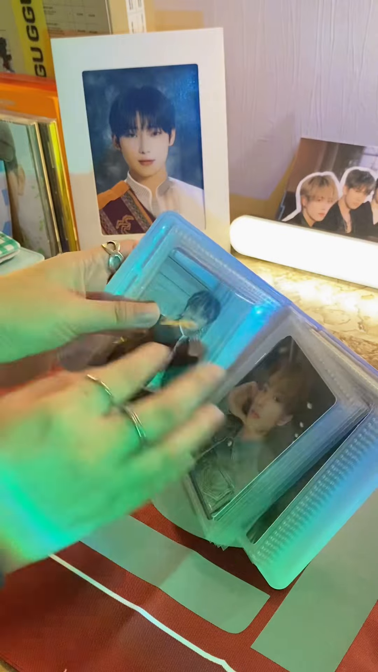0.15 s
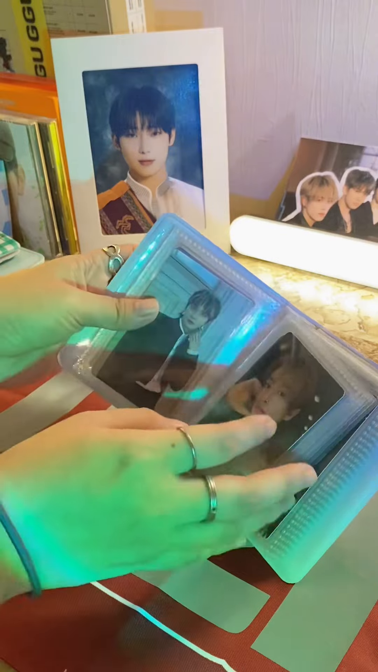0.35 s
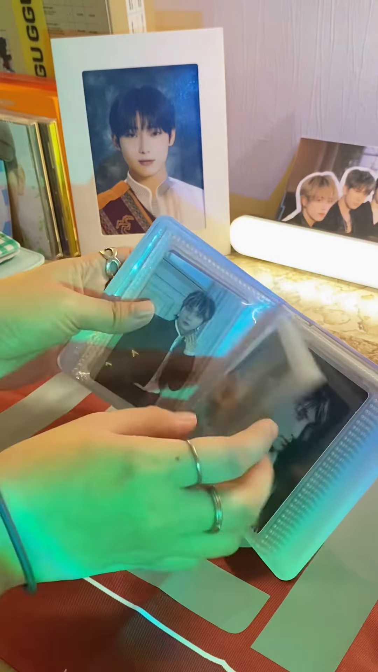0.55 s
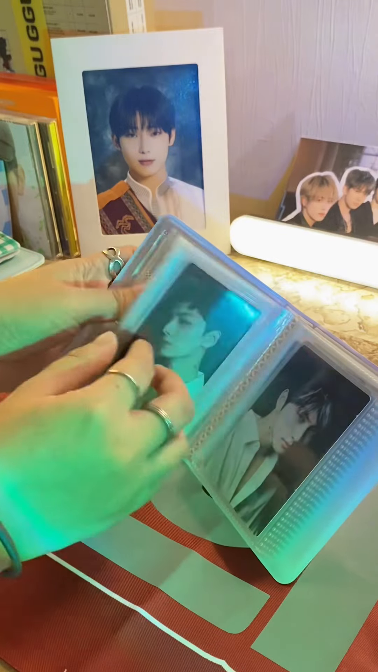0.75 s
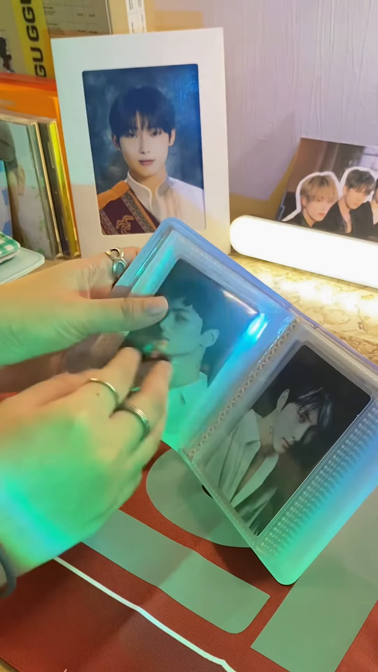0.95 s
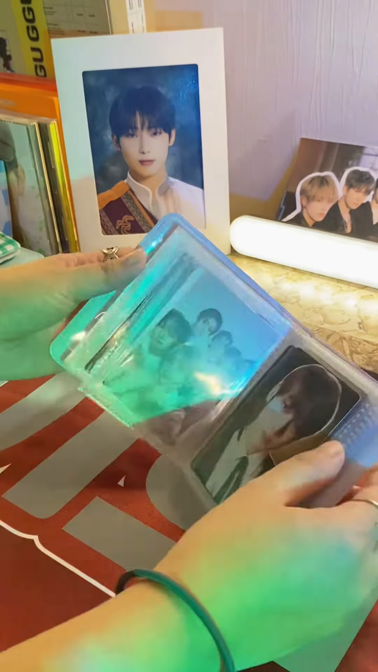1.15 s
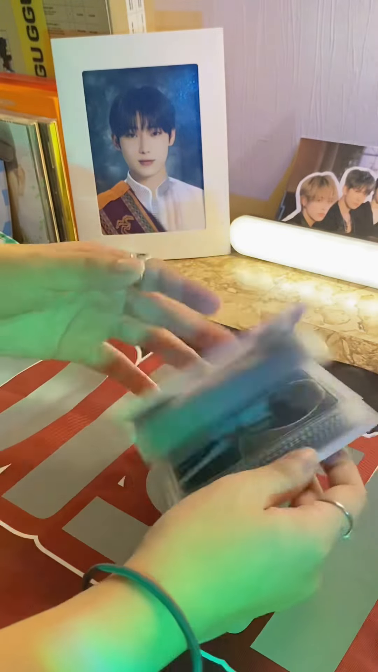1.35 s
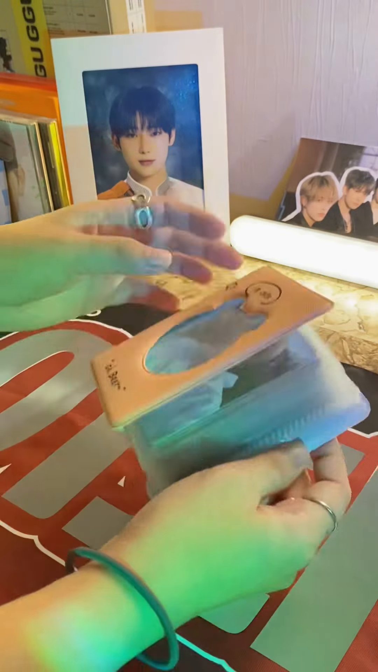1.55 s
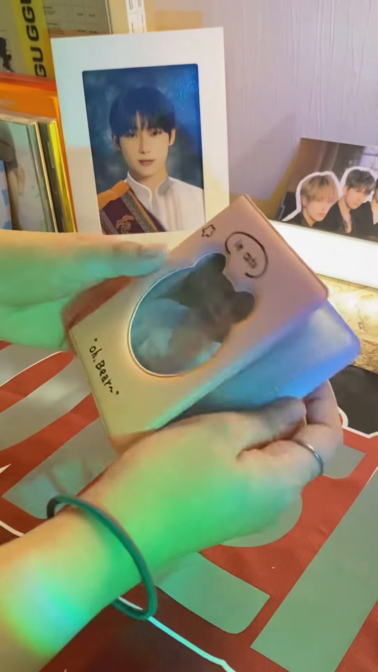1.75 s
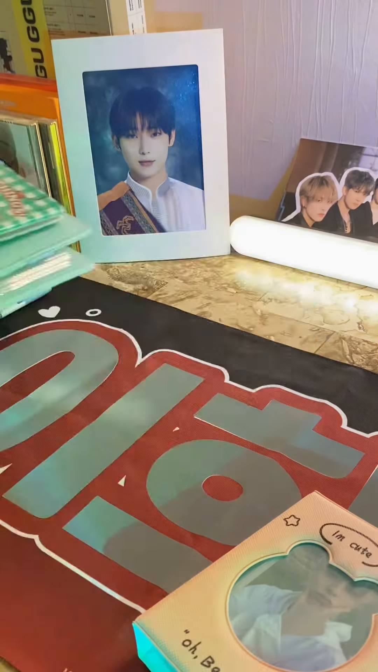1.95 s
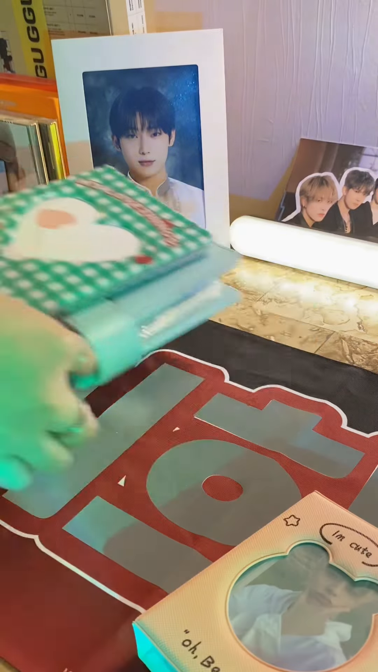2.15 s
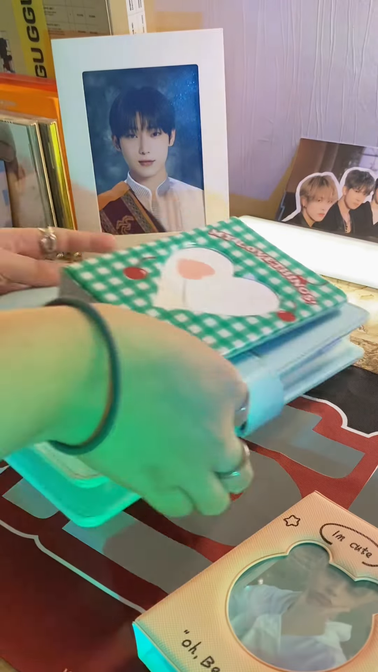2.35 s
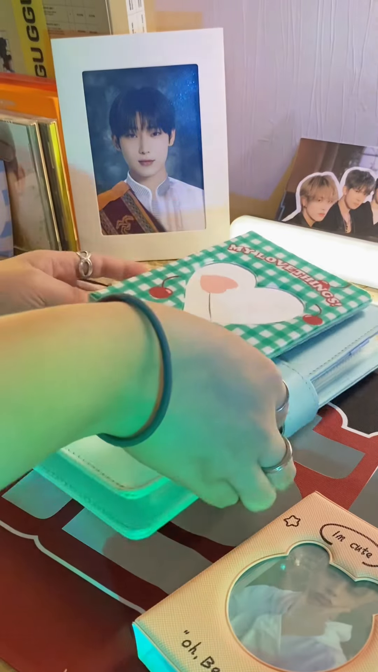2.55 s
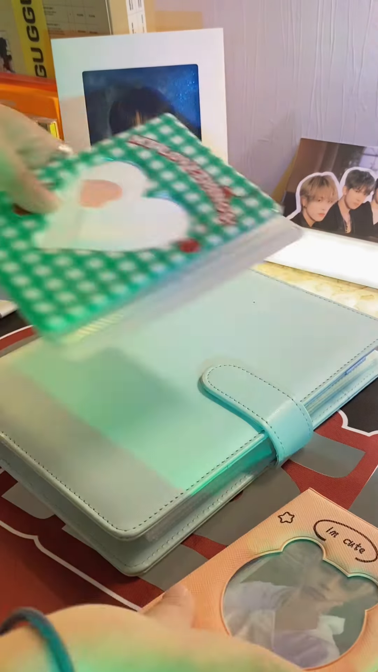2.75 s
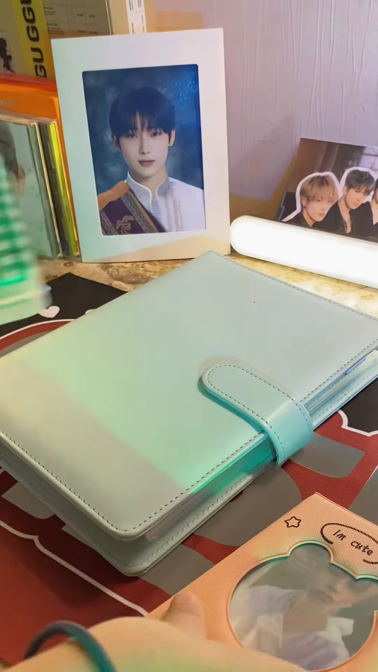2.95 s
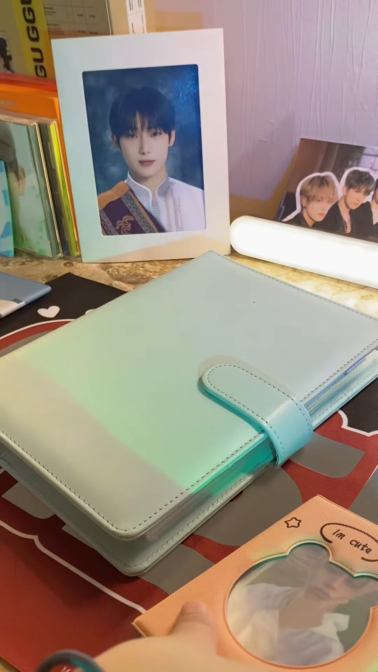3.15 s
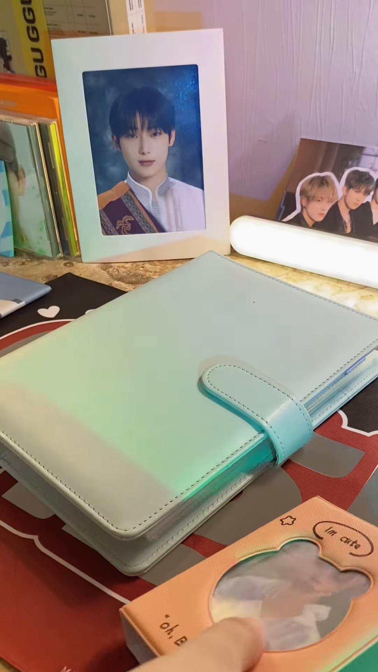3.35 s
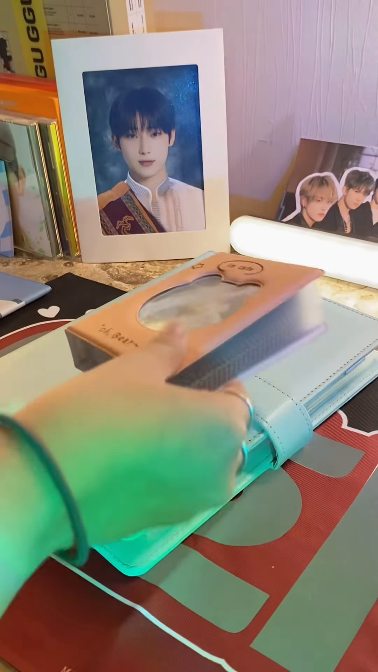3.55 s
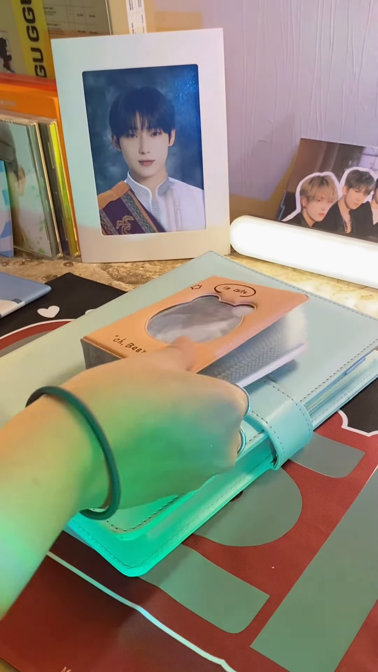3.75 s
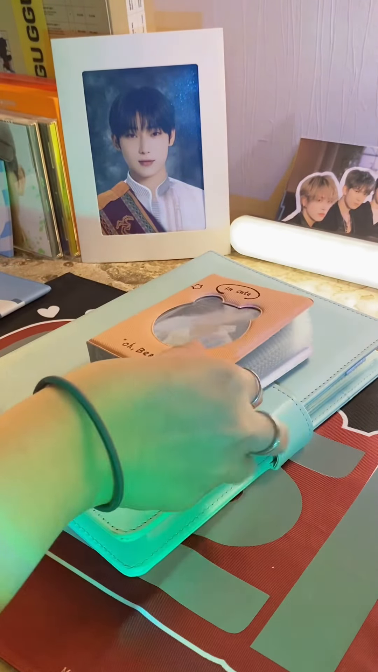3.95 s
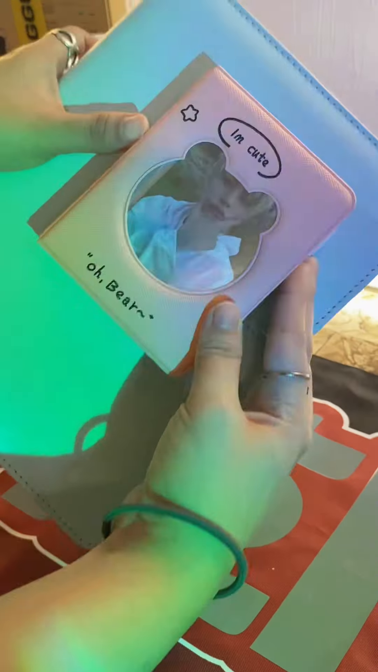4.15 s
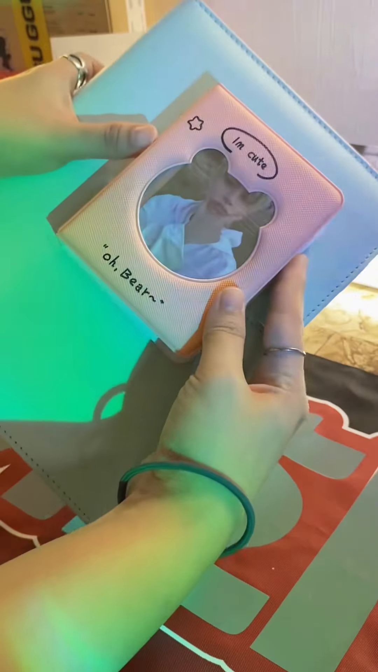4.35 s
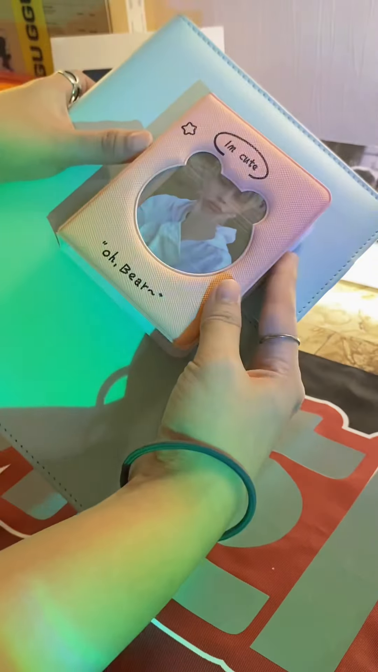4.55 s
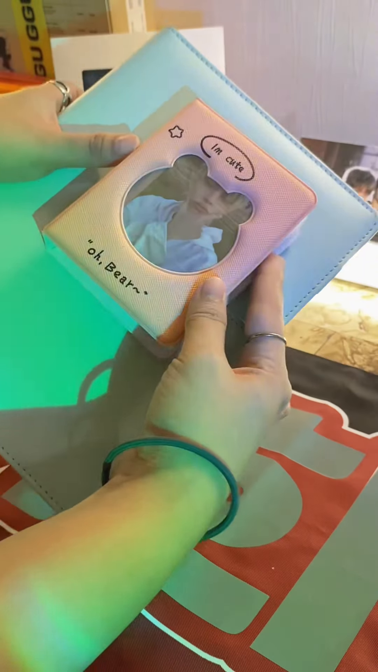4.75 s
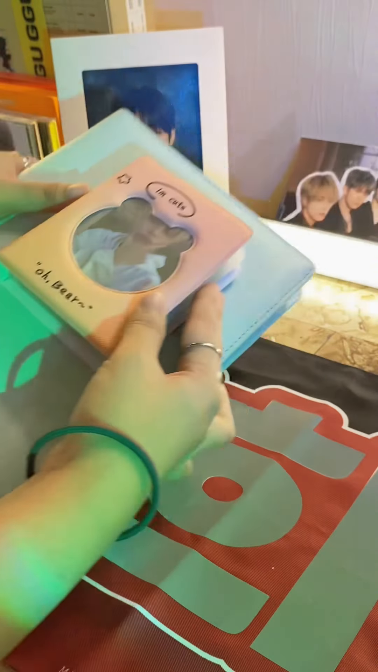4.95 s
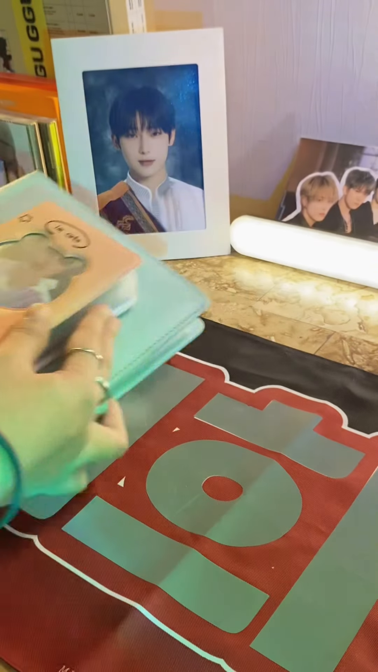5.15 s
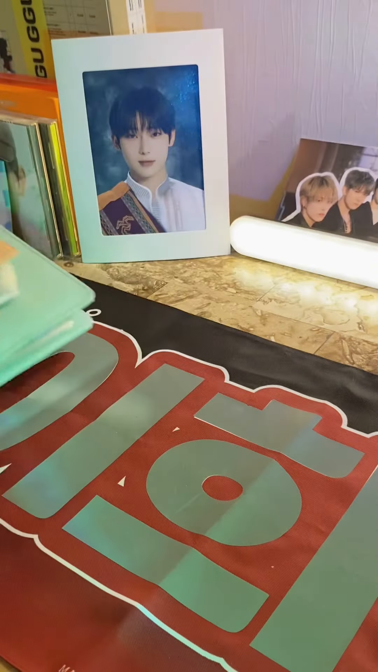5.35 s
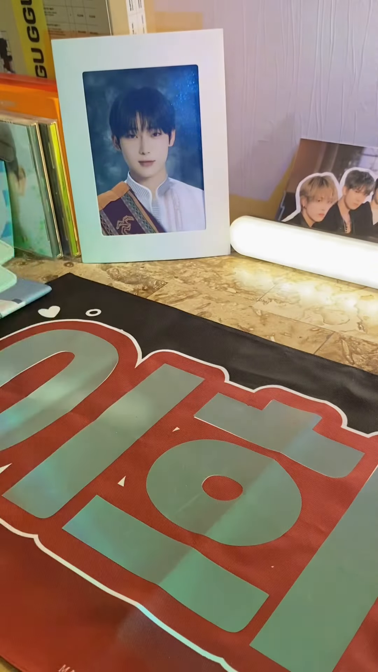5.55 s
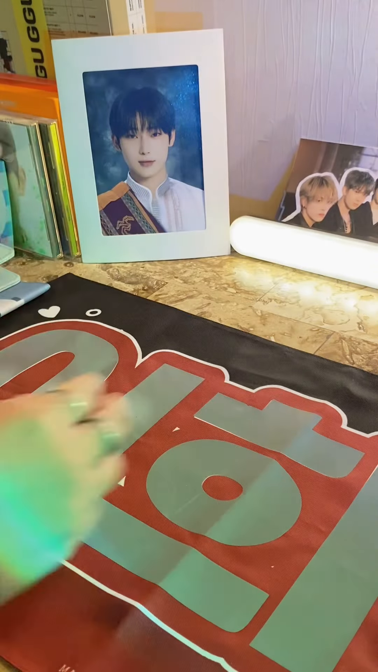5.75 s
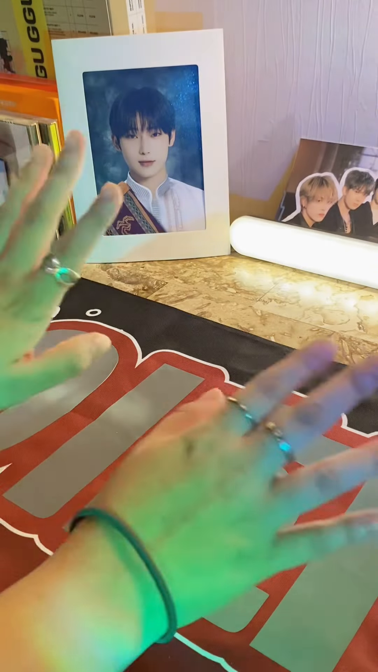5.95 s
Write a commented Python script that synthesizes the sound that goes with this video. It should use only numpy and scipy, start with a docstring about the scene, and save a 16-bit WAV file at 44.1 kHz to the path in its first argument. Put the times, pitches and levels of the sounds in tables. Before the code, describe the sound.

Stiff plastic pages are flipped in quick rustling strokes and brittle pops. A hard cover slaps shut at about 1.3 seconds with a woody desk thump and short flutter. Padded albums are then set down and moved with a dull knock near 2.7, a softer one near 3.7 and small clicks near 5.4. Quiet small room, close stereo pickup, low rumble and faint hiss.

```python
"""A small room: hands leaf through the clear plastic sleeves of a card album close to two microphone ports.
Sleeves slide and swish as stick-slip noise; creases snap and crackle as short bursts with a faint ring.
Covers slap shut as falling bending-wave chirps; dull contacts ring crowds of damped modes.
Padded binders bump the desk with slow cycles and drag as dull noise, above a low rumble, faint air
and each microphone's own faint hiss and low noise."""
import sys
import numpy as np
from scipy import signal
from scipy.fft import rfft, irfft, next_fast_len
from scipy.io import wavfile
from scipy.ndimage import uniform_filter1d, map_coordinates

SR = 44100
rng = np.random.default_rng(int(sys.argv[2]) if len(sys.argv) > 2 else 0)


def digitize_waveform(pressure):
    """Quantize a signal to 16-bit integers and store it at the path in sys.argv[1].

    Rows of a 2-D input are taken as channels; values are limited to [-1, 1].
    """
    field = np.atleast_2d(pressure).T
    bounded = np.clip(field, -1, 1)
    quanta = np.round(bounded * 32767).astype(np.int16)
    wavfile.write(sys.argv[1], SR, quanta)


N = 263968

# relative spectrum of the fine hiss of plastic: frequency_hz, density_db
FINE_HISS = [(3500, -25), (7000, -3.5), (10000, 1), (12500, 2.5), (15500, -9.5), (17000, -18)]


def sliding(friction_db=-1, hiss_db=0, drag_db=-2, sleeve_drag_db=-14, judder_db=1.82, patchy_db=4.0):
    """Stick-slip friction: sleeves and covers rub, and the uneven pressure of the hand shakes every band."""
    # plastic strokes, levels relative: start_s, length_s, friction_db, hiss_db, swell_over_stroke_db
    strokes = [(0.006, 0.0494, -68, -62.5, 15), (0.205, 0.063, -56.5, -59, 18),
               (0.366, 0.14, -61.5, -59.5, 14), (0.538, 0.075, -59, -58, 3), (0.678, 0.081, -61.5, -62, 23),
               (0.86, 0.034, -67, -66.5, 8.5), (1.114, 0.17, -55.5, -53, 3),
               (1.343, 0.085, -45.5, -56, -7.5), (1.44, 0.029, -55.5, -50.5, 7),
               (1.501, 0.109, -63.5, -90.5, -20), (1.663, 0.137, -57, -65, 0.5),
               (1.79, 0.093, -82.5, -58.5, 0), (1.945, 0.14, -74.5, -68, -9), (2.142, 0.3, -70, -72, -9),
               (2.489, 0.088, -64, -69.5, 9.5), (2.622, 0.074, -64.5, -68.5, 5.5),
               (3.029, 0.19, -73.5, -60, 26.5), (3.275, 0.096, -63.5, -62.5, 14.5),
               (3.396, 0.27, -92, -77.5, -2), (3.66, 0.032, -51.5, -57.5, -5),
               (3.782, 0.11, -59.5, -64, 11), (3.957, 0.054, -71, -59, 0.5), (5.38, 0.076, -58, -67.5, -10),
               (5.773, 0.16, -75, -76, -1.5)]
    # a padded binder or cover on the desk mat, levels relative: start_s, length_s, level_db, swell_db
    drags = [(1.361, 0.17, -53.5, -7.5), (2.189, 0.48, -70, 6), (3.025, 0.48, -74, -15.5),
             (3.813, 0.14, -71, -3), (4.878, 0.34, -68, -4)]
    # relative spectra of the rub and of the dull drag: frequency_hz, density_db
    friction_spectrum = [(400, -32), (1100, -3), (2200, 1), (5000, -0.5), (7000, -1.5), (9000, -13.5),
                         (16000, -32.5)]
    drag_spectrum = [(100, -22), (250, 10), (600, 2), (1100, -11.5), (2000, -19.5), (5000, -52)]

    # as a sleeve bends, its resonances come and go
    z = signal.stft(slips(rate=1500, spread_db=4, smooth=.8), nperseg=512)[2]
    field = rng.standard_normal(z.shape)
    field = uniform_filter1d(field, size=3, axis=0)  # over frequency
    field = uniform_filter1d(field, size=7, axis=1)  # over time
    friction = signal.istft(z * amp(patchy_db * unit(field)), nperseg=512)[1][:N]

    rub_gain, hiss_gain = np.zeros((2, N))
    for start, length, rub_level, hiss_level, swell_db in strokes:
        gain = stroke(start, length, swell_db)
        rub_gain += amp(rub_level) * gain
        hiss_gain += amp(hiss_level) * gain
    drag_gain = amp(sleeve_drag_db) * rub_gain
    for start, length, level_db, swell_db in drags:
        drag_gain += amp(level_db) * stroke(start, length, swell_db)

    rub = rub_gain * coloured(friction, friction_spectrum)
    hiss = hiss_gain * coloured(slips(rate=1900, spread_db=1.0, smooth=1.0), FINE_HISS)
    drag = drag_gain * coloured(slips(rate=730, spread_db=2.0, smooth=0.78), drag_spectrum)
    track = amp(friction_db) * rub + amp(hiss_db) * hiss + amp(drag_db) * drag
    return track * amp(judder_db * wobble(90))


def stroke(start, length, swell_db, grip_s=0.021, release_db_per_s=269.5):
    """Friction follows speed and pressure: a slide gets up to speed, swells or sags, then dies away."""
    t = np.arange(N) / SR - start
    grip = np.sin(np.pi / 2 * np.clip(t / grip_s, 0, 1)) ** 2
    pressure_db = swell_db * (np.clip(t / length, 0, 1) - .5)
    release_db = release_db_per_s * np.maximum(t - length, 0)
    return grip * amp(pressure_db - release_db)


def slips(rate, spread_db, smooth):
    """Stick and slip: tiny releases of uneven size, rate a second, on a bed of smooth rubbing."""
    releases = rng.random(N) < rate / SR
    grains = releases * rng.standard_normal(N)
    grains = grains * amp(spread_db * np.clip(rng.standard_normal(N), -2, 2))
    return unit(unit(grains) + smooth * rng.standard_normal(N))


def swishes():
    """Stick-slip in a brief skid: a sleeve or cover edge gives a short swell of noise around one pitch."""
    # half_s is the time from the peak to half amplitude, hiss_db is relative to the sheet:
    # peak_s, level_db, half_s, centre_hz, skirt_db_per_octave, hiss_db
    skids = [(0.347, -53, 0.0074, 3450, 3.5, 6), (0.479, -51, 0.0075, 4000, 2.5, -1),
             (0.627, -57, 0.013, 4500, 2.5, 12.5), (.7755, -35.5, 0.0038, 3300, 17, -6),
             (1.152, -45, 0.0025, 2526, 5, -11), (1.246, -39.5, 0.0053, 4020, 16, -3),
             (1.261, -36, 0.0084, 1840, 2, -16), (1.483, -41.5, 0.0066, 1520, 8, -6.5),
             (1.497, -38, 0.004, 1662, 4, -13.5), (1.745, -54.5, 0.039, 5440, 34, -11.5),
             (1.899, -59.5, 0.017, 5210, 20, -7), (2.527, -51.5, 0.0035, 1480, 5.5, -25),
             (2.648, -56.5, 0.0069, 3710, 29, -1.5), (2.734, -42.5, 0.0024, 690, 2, -21),
             (2.725, -54, 0.0037, 2500, 5, -8), (2.741, -39.5, 0.0042, 2508, 8, -9.5),
             (2.977, -55.5, 0.0021, 1683, 21, -12.5), (3.2, -61, 0.086, 5290, 39, -2),
             (3.333, -59, 0.0086, 1526, 2, -11.5), (3.384, -61, 0.0077, 695, 3.5, -5),
             (3.663, -52, 0.0071, 1100, 4, -9.5), (3.693, -50.5, 0.021, 2220, 24, -9.5),
             (3.883, -53, 0.031, 1830, 10, -25), (3.91, -47, 0.0072, 800, 8.5, -11),
             (3.997, -63, 0.016, 5370, 17.5, -5), (4.031, -60, 0.0049, 1000, 0, 1),
             (5.065, -84, 0.15, 557, 35, -32), (5.403, -53, 0.006, 5620, 11, -13.5),
             (5.413, -58.5, 0.0093, 1002, 4, -20), (5.504, -70, 0.0091, 1382, 6.5, -22),
             (5.802, -67.5, 0.012, 2700, 20, -14), (5.907, -61.5, 0.006, 3400, 19.5, -24)]
    track, t = np.zeros(N), np.arange(2 * SR // 3) / SR
    grit = slips(rate=4500, spread_db=3.0, smooth=1.0)
    hiss = coloured(grit, FINE_HISS)
    for s, level_db, half, centre_hz, skirt_db, hiss_db in skids:
        start = int(np.clip(round(s * SR) - len(t) // 2, 0, N - len(t)))
        part = slice(start, start + len(t))
        # rounded at the centre, straight skirts on an octave scale
        sheet = filtered(grit[part], lambda hz: amp(-skirt_db * np.hypot(.5, np.log2((hz + 1) / centre_hz))))
        sheet = unit(flexed(sheet, depth_db=1.0, knots=34))
        swell = 1 / np.cosh(1.3 * np.clip((t + start / SR - s) / half, -20, 20))
        track[part] += amp(level_db) * swell * (sheet + amp(hiss_db) * hiss[part])
    return track


def flexed(x, depth_db, knots):
    """Modal density: a bent sheet has new, crowded resonances at each touch."""
    ripple = np.clip(rng.standard_normal(200), -2, 2) * depth_db

    def resonances(hz):
        return amp(map_coordinates(ripple, [knots * np.log1p(hz / 1500)], mode="nearest"))
    return filtered(x, resonances)


def snaps(gain_db=-0.7, edge_db=2, ring_db=-12, body_t60=.009, edge_t60=.008, count=140):
    """Snap-through buckling: a crease pops with a sharp edge, a burst of the sheet and a faint card ring."""
    # single creases, rings and nails ticking, levels before gain_db: start_s, level_db, body_level_db
    pops = [(0.2, -44.5, -9), (.34, -38, -0.5), (.346, -28.5, -1.5), (.359, -41, -18), (.402, -34.5, -18),
            (.426, -38, -8), (.452, -35, 1), (.457, -31, -8), (0.4626, -26.5, -17), (.4696, -35, -6.5),
            (.4772, -28, -17.5), (.4833, -28, -7.5), (.4858, -28.5, -4), (0.4893, -20, -11.5),
            (0.4927, -20, -5), (.495, -28.5, -10.5), (.5148, -20, -11), (0.521, -26, -15),
            (0.5253, -31.5, 5), (0.5359, -12.5, -2), (0.5492, -30, -1.5), (1.482, -29, 4),
            (1.5268, -35.5, 1), (1.5315, -35, 6.5), (2.166, -35, 12.5), (2.3225, -43, 8.5),
            (2.528, -38.5, -1), (2.571, -37.5, -12), (3.87, -49, 8), (4.824, -58.5, 0.5), (5.139, -57, 12),
            (5.3994, -28, 12), (5.404, -34.5, 7), (5.794, -50.5, 17.5), (5.906, -54, 17)]
    # modes of a card in its sleeve, levels relative: pitch_hz, level_db, t60_s
    card_modes = [(1517, -11, 0.04), (1700, -2, .06), (2210, -10, 0.16), (2520, 0.5, 0.15),
                  (3204, -1, 0.055), (4538, -5.5, 0.038), (6260, -6.5, 0.11)]
    # relative spectrum of the sheet: frequency_hz, density_db
    sheet_spectrum = [(150, -31.5), (600, -23), (1100, -6), (1500, -5.5), (2800, -2), (4500, -2.5),
                      (7000, -1.5), (12000, -31)]

    track, t = np.zeros(N), np.arange(SR // 20) / SR
    bursts = rng.standard_normal((count, 2, len(t))) * (1 - np.exp(-t / 0.00045))
    modes = np.array([amp(db - 60 * t / t60) * np.sin(2 * np.pi * hz * t) for hz, db, t60 in card_modes])
    rings = amp(2 * rng.standard_normal((count, len(card_modes)))) @ modes  # uneven mode strengths
    for (s, level_db, body_db), (body_noise, edge_noise), ring in zip(pops + creases(), bursts, rings):
        body = unit(struck(body_noise * amp(-60 * t / body_t60), sheet_spectrum))
        body = body + amp(ring_db) * unit(ring)
        edge = unit(struck(edge_noise * amp(-60 * t / edge_t60), FINE_HISS))
        pop = amp(body_db) * body + amp(edge_db) * edge
        add(track, s, amp(level_db + gain_db) * pop / np.abs(pop).max())
    return track


def creases(count=28, per_s=240, spread_db=1, body_db=-2):
    """Crackling as a train of snap-throughs: unevenly spaced and sized pops, as rows for snaps."""
    # a bent sleeve crackles, levels typical for a pop before the snap gain: start_s, length_s, level_db
    crinkles = [(0.247, 0.083, -44.5), (0.472, 0.028, -37.5), (0.541, 0.009, -38.5), (1.374, .045, -39),
                (1.702, 0.11, -44.5), (2.634, 0.052, -59)]
    rows = []
    for start, length, level_db in crinkles:
        delays = (np.arange(count) + rng.random(count)) / per_s
        levels = level_db + spread_db * rng.standard_normal(count)
        rows += [(start + delay, level, body_db) for delay, level in zip(delays, levels) if delay < length]
    return rows


def knocks(rise_s=0.000043, count=14, size=80):
    """Modal ringing: each contact excites a crowd of damped modes, different wherever the cover is touched."""
    # dull contacts of album, binder and knuckles, modes spread to either side of the centre:
    # start_s, peak_db, centre_hz, spread_octaves, t60_s
    contacts = [(.359, -44.5, 1310, 0.34, 0.031), (.5245, -36, 1880, 0.65, 0.03),
                (.5357, -24.5, 1785, 0.64, 0.019), (0.549, -39, 1570, 0.59, 0.017),
                (0.567, -43.5, 1500, 0.25, 0.02), (1.36, -22, 680, 0.65, 0.017),
                (1.375, -31, 647, 0.7, 0.026), (1.464, -35, 703, 1.6, 0.036),
                (1.482, -30, 1000, 1.42, 0.02), (2.323, -48.5, 1934, 0.6, 0.0097),
                (2.524, -46, 762, 1.04, 0.033), (2.7385, -38, 1100, 0.93, 0.016),
                (3.307, -50.5, 1500, 0.34, 0.041), (3.3678, -43.5, 792, 1.38, 0.057),
                (3.376, -42.5, 456, 0.85, 0.053), (3.733, -41.5, 1270, 1.46, 0.024),
                (3.918, -35.5, 742, 0.94, 0.027), (4.031, -42.5, 1580, 1.07, 0.021),
                (4.824, -54.5, 1520, 1.48, 0.017), (5.3986, -43.5, 740, 0.39, 0.0348),
                (5.3997, -38.5, 2930, 0.33, 0.016), (5.495, -47.5, 2110, 1.57, 0.038)]
    track, t = np.zeros(N), np.arange(SR // 12) / SR
    draws = rng.random((size, 3, count, 1))
    for (s, peak_db, hz, octaves, t60), (place, weight, phase) in zip(contacts + leaves(), draws):
        position = 2 * (np.arange(count)[:, None] + place) / count - 1  # -1 to 1 across the spread
        modes_hz = hz * 2 ** (octaves * position)
        ring = np.sum((.5 + weight) * np.sin(2 * np.pi * (modes_hz * t + phase)), axis=0)
        ring = ring * amp(-60 * t / t60) * (1 - np.exp(-t / rise_s))
        add(track, s, amp(peak_db) * ring / np.abs(ring).max())
    return track


def leaves(count=10, per_s=100, spread_db=4.5, octaves=1, t60=0.013):
    """Successive impacts losing energy: loose sleeves fall onto one another, as rows for knocks."""
    # levels and pitch scatter about these: start_s, length_s, first_peak_db, last_peak_db, pitch_hz
    rattles = [(1.384, 0.051, -30.5, -45, 2800), (3.658, 0.047, -42, -53, 2400),
               (5.405, 0.063, -55, -67, 2320)]
    rows = []
    for start, length, first_db, last_db, hz in rattles:
        delays = (np.arange(count) + rng.random(count)) / per_s
        levels = first_db + (last_db - first_db) * delays / length
        levels = levels + spread_db * np.clip(rng.standard_normal(count), -2, 2)
        pitches = hz * 2 ** rng.uniform(-.5, 0.68, count)
        rows += [(start + delay, level, pitch, octaves, t60)
                 for delay, level, pitch in zip(delays, levels, pitches) if delay < length]
    return rows


def slaps(crack_t60=0.062, ring_db=4.5, sag_db=4.5, contact_db=11.5, scatter_db=-15.0):
    """Dispersion: bending waves in a cover arrive treble first, so each slap falls in pitch; the desk rings."""
    # covers landing, levels relative, cover_share (0-1) scales the cover's colour in dB:
    # start_s, level_db, first_pitch_hz, last_pitch_hz, glide_s, rise_s, t60_s, crack_db, cover_share
    landings = [(1.3442, 0.5, 3390, 178.6, 0.0013, 0.00041, 0.038, -11, 1),
                (2.728, -21.5, 1066, 143.5, 0.0032, 0.0025, 0.039, -16, .6),
                (3.650, -23.5, 2737, 238, 0.0034, 0.000098, 0.035, -9.5, 0)]
    # album and desk resonances, levels relative: pitch_hz, width_hz, level_db
    desk_modes = [(203.4, 120, 4.5), (407, 50, -3.5), (561, 39, -7.5), (930, 60, -9.5), (1923, 33, -12.5),
                  (2100, 77, -8.5), (2245, 41, -12), (2552, 46, -5.5), (2820, 50, -17), (4320, 72, -16.5),
                  (4540, 330, -10), (5230, 70, -17)]
    # relative spectrum of the crack: frequency_hz, density_db
    crack_spectrum = [(100, -19), (500, -11), (950, -10), (1400, -6.5), (1800, 0.5), (2400, 6.5),
                      (3000, -3.5), (3700, -4.5), (4700, 1), (6500, -3.5), (11000, -6.5), (16000, -17)]
    # how the cover radiates: frequency_hz, gain_db
    cover_response = [(60, -6), (200, -12), (480, 1.53), (720, -1.5), (950, 6.5), (1420, -10), (1750, -5),
                      (2400, -3.2), (3100, 6), (3700, 6), (4700, -8.5), (7000, -14)]

    def desk(hz):
        response = 0
        for k, (centre, width, db) in enumerate(desk_modes):
            mode = 1j * hz * width / (centre * centre - hz * hz + 1j * hz * width)
            response = response + (-1) ** k * amp(db) * mode  # neighbours alternate in sign
        return response

    track, t = np.zeros(N), np.arange(SR // 4) / SR
    for s, level_db, first_hz, last_hz, glide, rise, t60, crack_db, share in landings:
        early = 1 / (1 + (t / glide) ** 2) ** 2  # falls from 1 towards 0
        pitch = last_hz + (first_hz - last_hz) * early
        attack = 1 - np.exp(-t / rise)
        bend = np.sin(2 * np.pi * np.cumsum(pitch) / SR)
        bend = bend * amp(-60 * t / t60 - sag_db * (2.0 - early))
        fade = attack * amp(-60 * t / crack_t60)
        scatter = unit(struck(rng.standard_normal(len(t)) * fade, crack_spectrum))
        scatter = scatter * np.sqrt(np.mean(fade ** 2))
        contact = struck(1. * (t == 0), crack_spectrum)  # the hard first touch
        crack = amp(contact_db) * contact / np.abs(contact).max() + amp(scatter_db) * scatter
        colour = [(hz, share * gain_db) for hz, gain_db in cover_response]
        blow = struck(attack * bend, colour) + amp(crack_db) * crack
        add(track, s, amp(level_db) * (blow + amp(ring_db) * filtered(blow, desk)))
    return track


def bumps():
    """Soft impact: padded binders push a few slow cycles out of the desk under a bell-shaped envelope."""
    # spread_s is the standard deviation of the bell: centre_s, level_db, pitch_hz, spread_s
    thuds = [(1.352, -27.5, 129.1, 0.006), (1.515, -51, 149, 0.015), (2.55, -40, 75, 0.0094),
             (2.743, -25, 127, 0.0042), (3.38, -50, 121, 0.018), (3.669, -50, 205, 0.012),
             (3.689, -41, 72.2, 0.016), (3.713, -39.5, 105, 0.0068), (5.856, -43.5, 78.9, 0.0062)]
    t, track = np.arange(N) / SR, np.zeros(N)
    for s, level_db, hz, spread in thuds:
        envelope = np.exp(-.5 * ((t - s) / spread) ** 2)
        track += amp(level_db) * envelope * np.cos(2 * np.pi * hz * (t - s))
    return track


def background(rumble_db=-57, air_db=-74, handling_db=-56, microphone_db=-68.0):
    """Shaped random noise: rumble, air, the album wobbling in the hands early on, and microphone noise."""
    # relative spectra of the room rumble and the faint air: frequency_hz, density_db
    rumble_spectrum = [(12, -56), (20, -23.5), (35, -0.5), (107, 2.5), (217, -15), (320, -21.5),
                       (430, -31.5), (630, -49), (1500, -58.5), (3300, -120)]
    air_spectrum = [(200, -6), (1200, -12), (2000, -5), (4000, -9), (8000, -10.5), (12000, -13.5),
                    (13200, -7), (14500, -40)]
    # relative spectrum of each microphone's own faint hiss and low noise: frequency_hz, density_db
    microphone_spectrum = [(30, 1.5), (250, 6), (600, 1), (1000, -3.5), (1500, -7), (2000, -15.5),
                           (12000, -50), (14500, -44.5)]
    flex_spectrum = [(20, -29.0), (48, -2.5), (70, -11.0), (200, -46.5), (1000, -87.0)]

    t = np.arange(N) / SR
    rumble = amp(rumble_db + 0.5 * wobble(19)) * coloured(rng.standard_normal(N), rumble_spectrum)
    air = amp(air_db) * coloured(rng.standard_normal(N), air_spectrum)
    # independent at the two ports
    microphone_noise = amp(microphone_db) * coloured(rng.standard_normal((2, N)), microphone_spectrum)
    flex = amp(handling_db) * coloured(rng.standard_normal(N), flex_spectrum)
    leafing = np.interp(t, [0, .35, 1, 1.3], [0.0, 0.75, 1, 0.015])
    return ports(rumble + air + flex * leafing) + microphone_noise


def room(x):
    """Reverberation: a noise tail decaying at its own rate in each band, different at each port."""
    # reverberation time: frequency_hz, t60_s
    decay_times = [(100, 0.66), (500, 0.24), (3000, 0.11), (8000, 0.028), (16000, 0.24)]
    hz, t, z = signal.stft(rng.standard_normal((2, SR // 2)), SR, nperseg=256)
    decay = amp(-60 * t / along(decay_times, hz)[:, None])
    tail = signal.istft(z * decay, SR, nperseg=256)[1]
    tail = tail * (1 - np.exp(-np.arange(tail.shape[1]) / SR / 0.003))  # builds up over a few ms
    return signal.fftconvolve(x[None], tail / np.linalg.norm(tail[0]), axes=1)[:, :N]


def diffuse(pair, apart_hz=1200):
    """Diffuse-field coherence: alike at both ports in the bass, unrelated in the treble."""
    side = filtered(pair[1], lambda hz: hz / np.hypot(hz, apart_hz))
    return np.array([pair[0] + side, pair[0] - side]) / np.sqrt(2)


def ports(x):
    """Phase and level differences of a pair: the left port leads the right and is mostly a little weaker."""
    # phase by which left leads right: frequency_hz, lead_rad
    phase_lead = [(50, .03), (250, .12), (550, .25), (1200, .22), (2700, .55), (4300, .7), (5400, .8),
                  (6300, 2), (7400, 3.14), (9000, 4.8), (10400, 6.28), (11700, 7.4), (13600, 9.42),
                  (16000, 12.3)]
    # left minus right sensitivity: frequency_hz, difference_db
    level_tilt = [(80, 0), (250, -.7), (600, -1.8), (1200, -1.1), (2500, -1.5), (5000, -.9), (8000, -.1),
                  (14000, -.2)]

    def response(hz):
        # each port takes half of the difference
        lead = .5 * np.outer([1, -1], along(phase_lead, hz))
        tilt_db = .5 * np.outer([1, -1], along(level_tilt, hz))
        return np.exp(1j * lead) * amp(tilt_db)
    return filtered(x, response)


def amp(db):
    """Logarithmic level: decibels to amplitude gain."""
    return 10 ** (np.asarray(db) / 20)


def unit(x):
    """Normalised power: scale to rms 1."""
    return x / np.sqrt(np.mean(x ** 2) + 1e-20)


def along(points, hz):
    """Logarithmic frequency scale: (frequency_hz, value) points joined by straight lines."""
    f, v = np.transpose(points)
    return np.interp(np.log(hz + 1), np.log(f + 1), v)


def filtered(x, response):
    """Linear filtering: the spectrum of x times a complex response of frequency."""
    n = x.shape[-1]
    m = next_fast_len(n + 4096)
    return irfft(rfft(x, m) * response(np.fft.rfftfreq(m, 1 / SR)), m)[..., :n]


def coloured(x, spectrum):
    """Zero-phase colouring: x shaped by a spectrum, at rms 1."""
    return unit(filtered(x, lambda hz: amp(along(spectrum, hz))))


def struck(x, spectrum, size=2048):
    """Minimum phase: a causal colour made by folding the cepstrum, so that nothing rings ahead of a blow."""
    cepstrum = irfft(np.log(amp(along(spectrum, np.fft.rfftfreq(size, 1 / SR)))))
    cepstrum[1:size // 2] *= 2
    cepstrum[size // 2 + 1:] = 0
    return signal.fftconvolve(x, irfft(np.exp(rfft(cepstrum))))[:len(x)]


def add(track, s, sound):
    """Superposition: mix a sound in at s seconds."""
    start = max(round(s * SR), 0)
    track[start:start + len(sound)] += sound[:N - start]


def wobble(rate):
    """Band-limited fluctuation: a smooth random curve with rate knots a second."""
    knots = rng.standard_normal(int(N * rate / SR) + 4)
    return map_coordinates(knots, [np.arange(N) * rate / SR])


def scene():
    """Direct and reverberant sound: near plastic and desk sounds, their room, and the background."""
    plastic = sliding() + swishes() + snaps() + knocks()
    blows = slaps()
    direct = ports(plastic + blows + bumps())
    reverberant = diffuse(room(amp(-13.5) * plastic + amp(-17.0) * blows))
    return direct + reverberant + background()


def record(dry, top_hz=16400):
    """Clipping and band limit: peaks are held to full scale, then nothing passes from top_hz up."""
    return filtered(np.clip(dry, -1, 1), lambda hz: hz < top_hz)


dry = scene()
out = record(dry)
digitize_waveform(out)
```